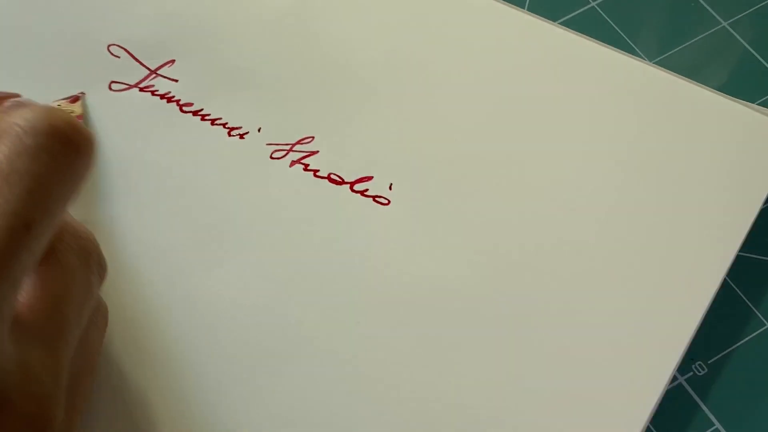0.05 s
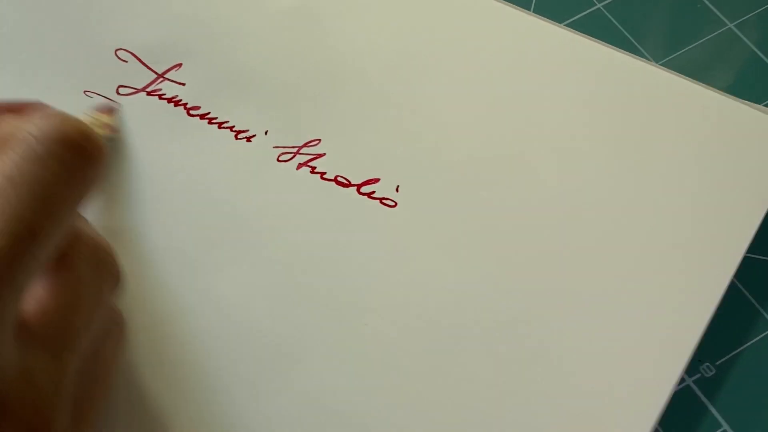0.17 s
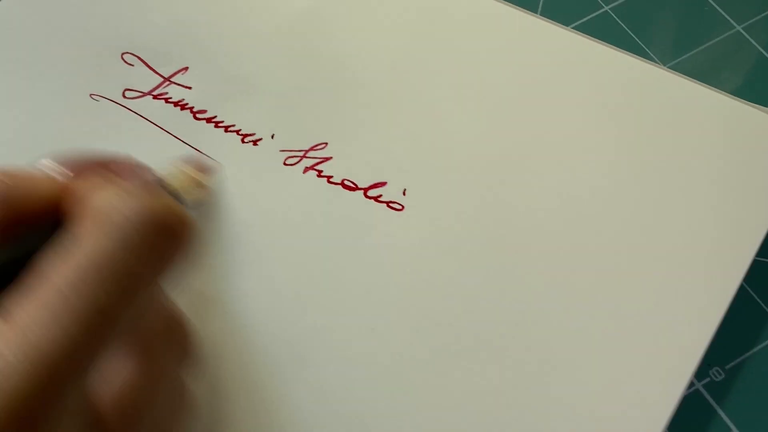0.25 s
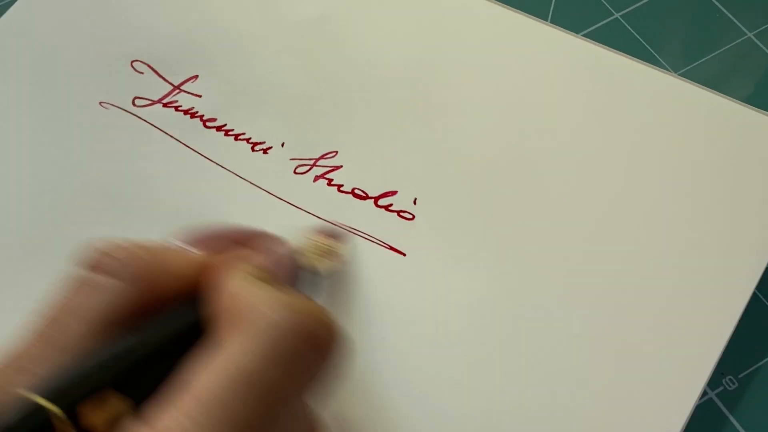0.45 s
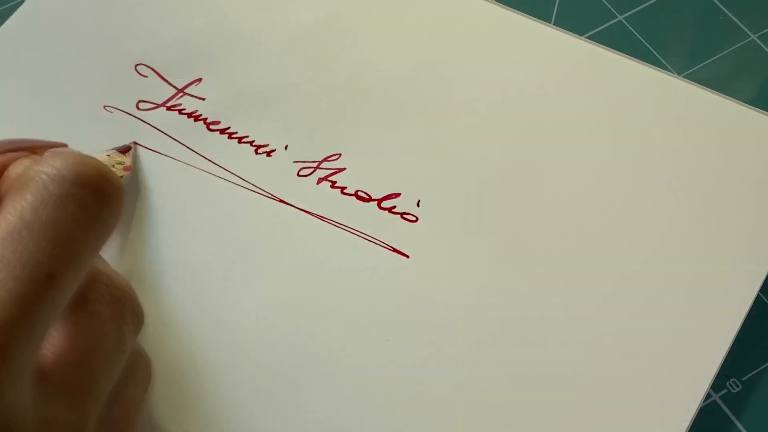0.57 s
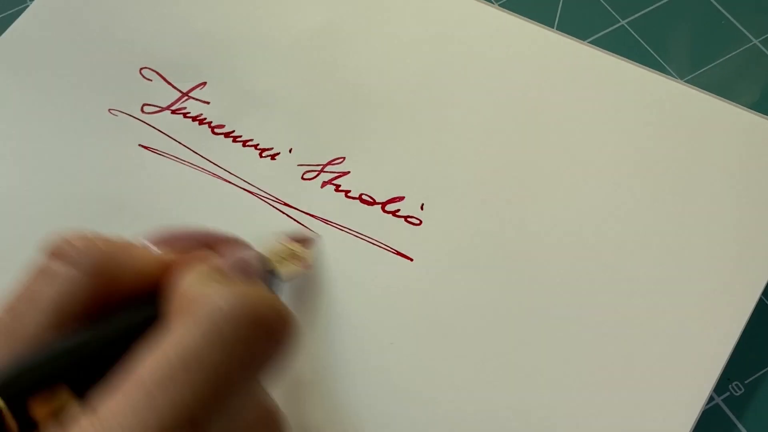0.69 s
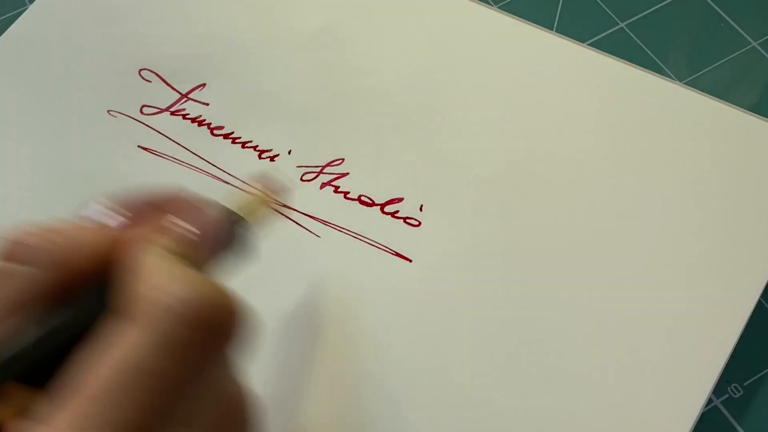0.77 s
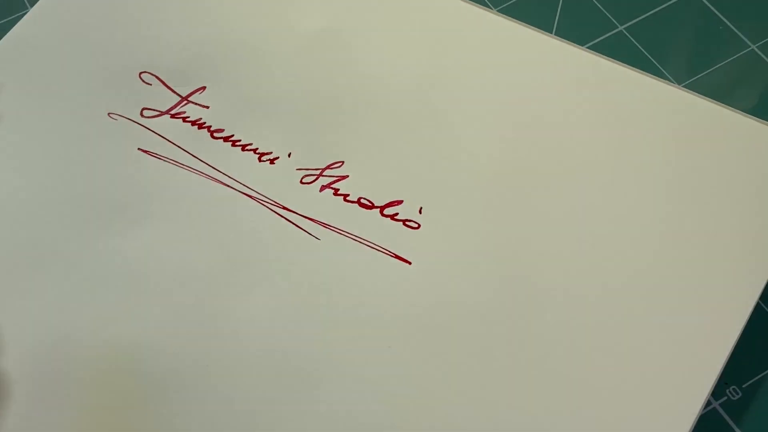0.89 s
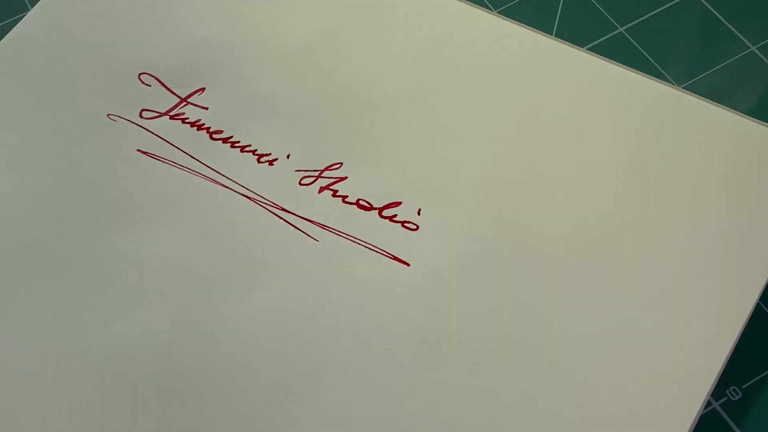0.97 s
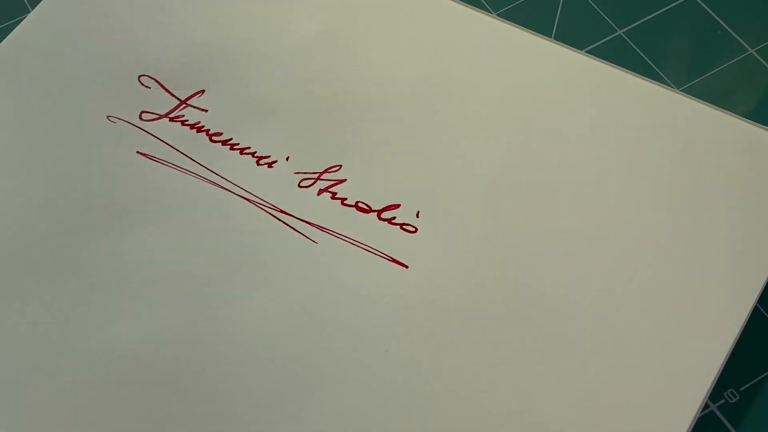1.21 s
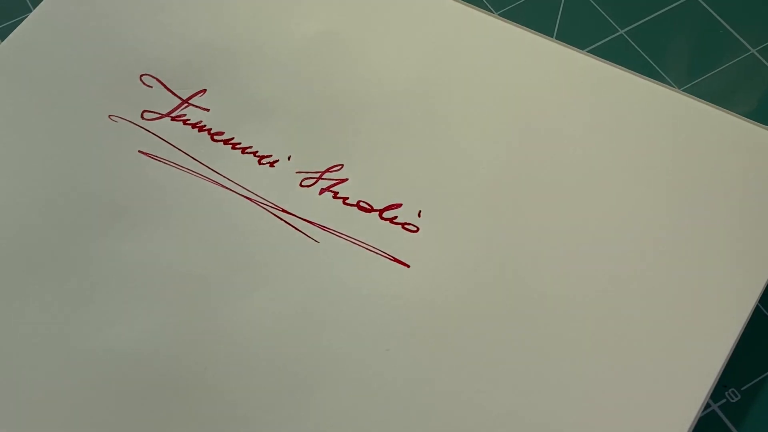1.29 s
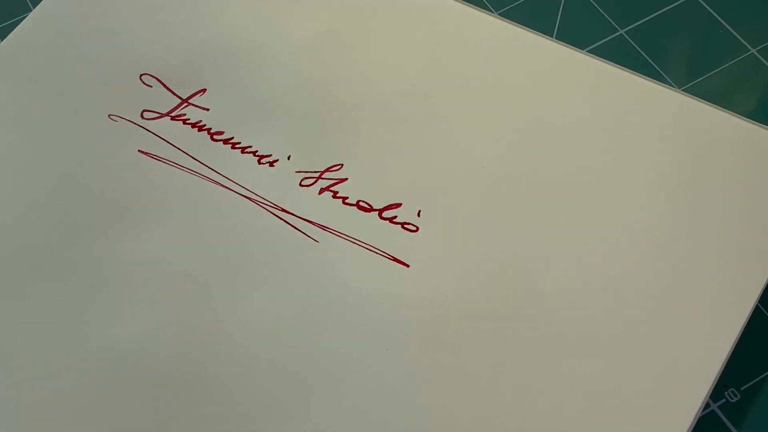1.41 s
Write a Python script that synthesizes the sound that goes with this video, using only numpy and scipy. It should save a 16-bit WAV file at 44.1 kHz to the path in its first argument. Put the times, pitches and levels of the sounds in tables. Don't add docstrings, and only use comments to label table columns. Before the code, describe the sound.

Fountain pen scratching three quick underlines on paper, then a soft hand rub, in a quiet room

```python
import sys
import numpy as np
from scipy import signal
from scipy.fft import rfft, irfft
from scipy.io import wavfile

SR = 44100
rng = np.random.default_rng(int(sys.argv[2]) if len(sys.argv) > 2 else 0)


def materialize(psi):
    bounded = np.clip(np.atleast_2d(psi).T, -1, 1)
    quanta = np.round(bounded * 32767).astype(np.int16)
    wavfile.write(sys.argv[1], SR, quanta)


def elevation(decibels):
    levels = np.asarray(decibels, float)
    return 10 ** (levels / 20)


N = 63945

# [f/Hz, level/dB per Hz]
AIR_SPECTRUM = [(22, -42), (45, -2.5), (100, -3), (280, -7.5), (500, -16), (2000, -26.5), (10000, -43.5),
                (15000, -40)]
# [f/Hz, time to fall 60 dB/s]
ECHO_TIMES = [(300, 1), (1500, 0.46), (4000, 0.37), (8000, 0.22), (14000, 0.22)]
# [t/s, level/dB, f/Hz]
DESK_JOLTS = [
    (0.367, -43.5, 100),
    (0.567, -45, 120),
    (0.806, -45.5, 70),
    (1.024, -45.5, 102),
    (1.235, -47.5, 100),
]
# [t/s, level/dB, brightness/dB, cupped palm ring/dB]
HAND_MOVES = [(0, -84, 4, -15), (0.062, -72.5, 1.5, -4.5), (0.138, -67, -5.5, -14), (.3, -64.5, 7, -11),
              (.75, -63, 1, -26), (.82, -54.5, 1, -37), (.895, -63, 7, -36), (.935, -64.5, -1, -18),
              (.965, -63.5, -6, -10), (.99, -62, 1.5, -8), (1.05, -60.5, 6.5, -30),
              (1.091, -60.5, 4.5, -25), (1.12, -63.5, -1, -5), (1.21, -60, -3, -9), (1.25, -60, 0, -5.5),
              (1.436, -60, 0, -7), (1.45, -59.5, 6, -1)]
# [f/Hz, level/dB per Hz]
RUB_SPECTRUM = [(150, -7.5), (400, 3.5), (1200, -2), (3000, -3), (5300, -10), (8800, -10.5), (10600, -24.5),
                (14300, -14.5)]
PALM_TONES = [1290, 3030, 3980, 4950]
# [width/Hz, level/dB]
PALM_MODES = [(150, -5), (220, 0), (180, -8), (400, -7)]
# [start t/s, length/s, level/dB, from f/Hz, to f/Hz]
BRUSHES = [
    (0.071, 0.074, -64.5, 1500, 1850),
    (0.085, 0.057, -67, 925, 1050),
    (0.702, 0.14, -55, 2480, 2600),
    (0.82, .11, -65, 4730, 5600),
    (1.014, 0.098, -62, 4800, 5300),
]
# [t/s, pressure level/dB, speed brightness/dB, sheet tone lean/dB per octave]
PEN_STROKES = [
    [(.152, -82, -11, -9), (.169, -50.5, 0, -16), (.2, -44, -5.5, 2), (.26, -40, -2, 1.5),
     (.31, -37, -1.5, 4), (.365, -37.5, -1.5, 11.5), (.4, -38.5, -9.5, -5), (.425, -76, -11, 2)],
    [(.443, -58, -3, 3), (.45, -41.5, 1.5, -17), (.468, -43.5, 0, 15), (.488, -36.5, -3.5, 2.5),
     (.54, -45, 9.5, 10), (.57, -37.5, 1, 5.5), (.598, -37.5, -7, 1.5), (.62, -51, -17, 6)],
    [(.628, -56, -5, -9), (.64, -35, -1, 1), (.668, -34.5, 3.5, 3), (.706, -36, 1, -5),
     (.722, -39, -3.5, -6), (.74, -59.5, -1, 36), (.79, -78, 0, 19)],
]
STROKE_TURNS = (.43, .625)
# [f/Hz, level/dB per Hz]
SHEET_SPECTRUM = [(150, -51), (330, -15), (1000, -4), (2100, -3), (3800, -9), (5500, -16.5), (9000, -28.5),
                  (12500, -22), (15000, -14.5)]
BODY_TONES = [330, 815, 1040, 1275, 1500, 1660, 1940, 2068, 2362, 2785, 2995, 3120, 3500]
# [width/Hz, level/dB in stroke one, two, three]
BODY_MODES = [(28.4, -15, -14, -15), (53, -6.5, -15.5, -14), (74.4, -23, -2.5, -22), (81, -11, -5.5, -42),
              (70, 0.5, -16, -6.5), (70, -13, -9.5, -8), (42.3, 0.5, 1.5, 8.5), (57, 0, 2, -7),
              (43.7, 0.5, -1.5, -2.5), (50, -6, -24, -9), (54.6, -9, -7.5, -3.5), (48, -13, -8, -2),
              (100, -13, -38, -13)]
TINE_TONES = [4315, 4950, 5090, 6640, 7120, 7980, 8550, 14200, 14750, 15050]
# [width/Hz, level/dB in stroke one, two, three]
TINE_MODES = [(83.333, -6, -19, -6), (218, -2.5, -3, -6), (204, -4, -6, -3), (119, -20, -16, -14),
              (150, -26, -25, -15), (298, -7, -18, -11), (243, -25, -27, -20), (500, -14, -20, -23),
              (395, -16, -17, -10), (600, -12, -11, -11)]


def evened(x):
    return x / np.sqrt(np.mean(x ** 2) + 1e-20)


def read(points, hz):
    f, value = np.transpose(points)
    return np.interp(np.log(hz + 1), np.log(f + 1), value)


def colour(x, points):
    gain = elevation(read(points, np.fft.rfftfreq(len(x), 1 / SR)))
    return irfft(rfft(x) * gain, len(x))


def brighten(x, db):
    low = signal.sosfiltfilt(signal.butter(2, 3500, fs=SR, output="sos"), x)
    return low + (x - low) * elevation(db)


def drift(rate_hz):
    f = np.geomspace(rate_hz / 8, rate_hz, num=12)[:, None]
    t = np.arange(0, N + 32, 32)
    waves = np.sin(2 * np.pi * (f * t / SR + rng.random(f.shape))) / np.sqrt(f)
    return np.interp(np.arange(N), t, evened(waves.sum(0)))


def slips(per_s, spread_db):
    size = elevation(spread_db * np.minimum(rng.exponential(1, N), 5)) * rng.standard_normal(N)
    happens = rng.random(N) < per_s / SR
    return evened(size * happens)


def resonate(x, hz, width):
    b, a = signal.iirpeak(min(hz, .45 * SR), hz / width, SR)
    return signal.lfilter(b, a, x) / np.sqrt(width)


def rings(x, places_hz, modes, lean=0):
    stroke = np.searchsorted(STROKE_TURNS, np.arange(N) / SR)
    total = 0
    for hz, (width, *db) in zip(places_hz, modes):
        feed_db = np.take(db, stroke, mode="clip") + lean * np.log2(hz / 1800)
        feed_db = feed_db + 1.2 * drift(35)
        total = total + resonate(x * elevation(feed_db), hz, width)
    return total


def air():
    level_db = -61 + 1.0 * drift(10)
    return elevation(level_db) * evened(colour(rng.standard_normal(N), AIR_SPECTRUM))


def room(x):
    hz, t, z = signal.stft(rng.standard_normal(SR // 2), SR, nperseg=256)
    t60 = np.maximum(read(ECHO_TIMES, hz), .05)[:, None]
    tail = signal.istft(z * elevation(-60 * t / t60), SR, nperseg=256)[1]
    tail[:round(.004 * SR)] = 0
    return signal.fftconvolve(x, tail / np.linalg.norm(tail))[:N]


def desk():
    rise_s, t60_s, sag = 0.015, 0.093, 0.34
    out, t = np.zeros(N + SR), np.arange(SR // 4) / SR
    for s, db, hz in DESK_JOLTS:
        turns = hz * np.cumsum(1 - sag * (1 - np.exp(-t / 0.09))) / SR
        swell = elevation(db - 60 * t / t60_s) * (1 - np.exp(-t / rise_s))
        out[round(s * SR):][:len(t)] += swell * 2 * np.sin(2 * np.pi * turns)
    return out[:N]


def hand():
    t, level, bright_db, palm_db = np.transpose(HAND_MOVES)
    now = np.arange(N) / SR
    snags = slips(14000, 0.79) * elevation(0.68 * drift(39.37))
    rub = evened(colour(snags, RUB_SPECTRUM))
    palm = evened(rings(snags, PALM_TONES, PALM_MODES))
    x = rub + elevation(np.interp(now, t, palm_db)) * palm
    return brighten(x, np.interp(now, t, bright_db)) * elevation(np.interp(now, t, level))


def graze(start, length, db, from_hz, to_hz):
    u = np.clip((np.arange(N) / SR - start) / length, 0, 1)
    turn = np.exp(2j * np.pi * np.cumsum(from_hz + (to_hz - from_hz) * u) / SR)
    r = np.exp(-np.pi * to_hz / 6 / SR)
    ringing = signal.lfilter([1], np.convolve([1, -r], [1, -r]), slips(6300, 2) / turn)
    whisper = (turn * ringing).real
    return elevation(db) * np.sin(np.pi * u ** 0.76) * evened(whisper)


def nib():
    t, level, bright_db, lean = np.transpose(sum(PEN_STROKES, []))
    now = np.arange(N) / SR
    drive = slips(11000, 0) * elevation(0.3 * drift(120))
    pressed = drive * elevation(np.interp(now, t, level, -120, -120))
    biting = pressed * elevation(.35 * (np.interp(now, t, level) + 37))
    body = rings(biting, BODY_TONES[1:], BODY_MODES[1:], np.interp(now, t, lean))
    tines = rings(pressed, BODY_TONES[:1] + TINE_TONES, BODY_MODES[:1] + TINE_MODES)
    scratch = colour(pressed, SHEET_SPECTRUM) / np.std(colour(drive, SHEET_SPECTRUM))
    x = (body + tines) * elevation(27.5) + scratch * elevation(-4.5)
    return brighten(x, np.interp(now, t, bright_db))


def scene():
    pen = nib()
    echoes = elevation(-11) * room(pen)
    brushes = sum(graze(*g) for g in BRUSHES)
    return (pen + echoes + brushes + hand() + desk() + air())[None]


def band_limit(x):
    return signal.sosfilt(signal.butter(12, 15750, fs=SR, output="sos"), x)


def record(dry):
    lowpass = signal.firwin(511, 15720, window=("kaiser", 9), fs=SR)
    band = signal.oaconvolve(dry, lowpass[None], "same")
    return band_limit(band)


dry = scene()
out = record(dry)
materialize(out)
```